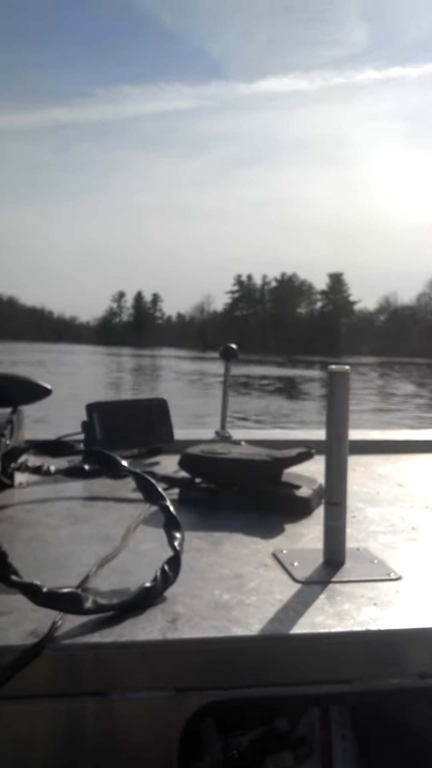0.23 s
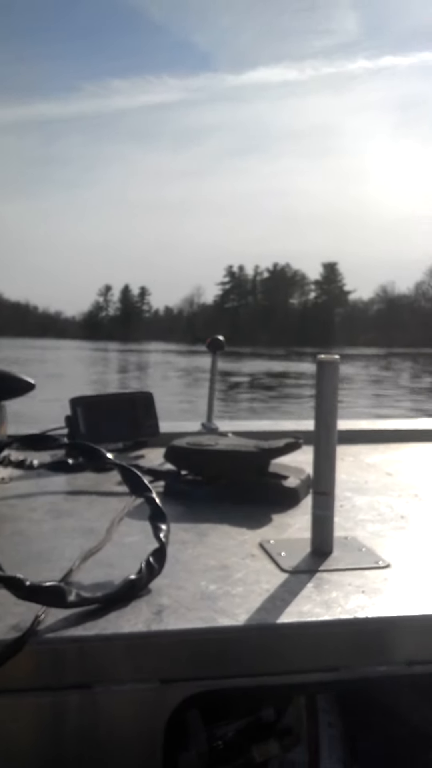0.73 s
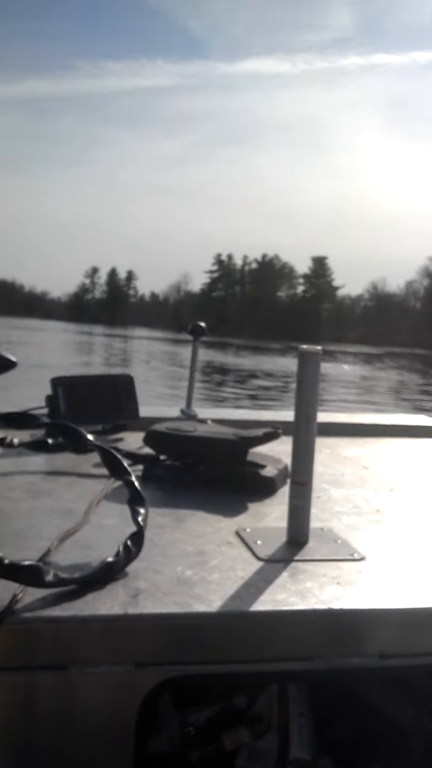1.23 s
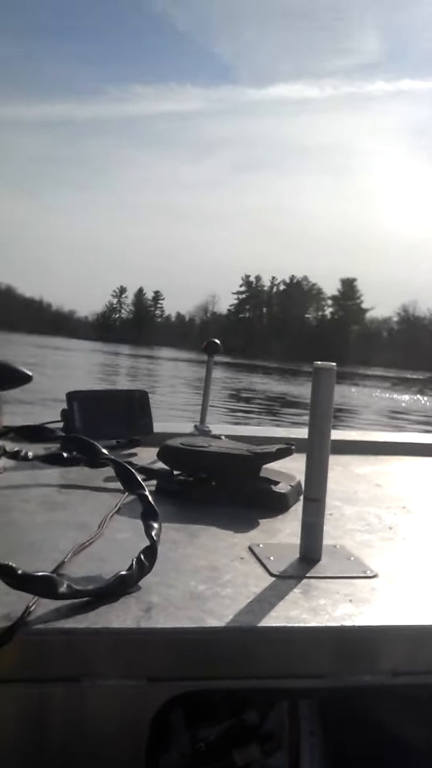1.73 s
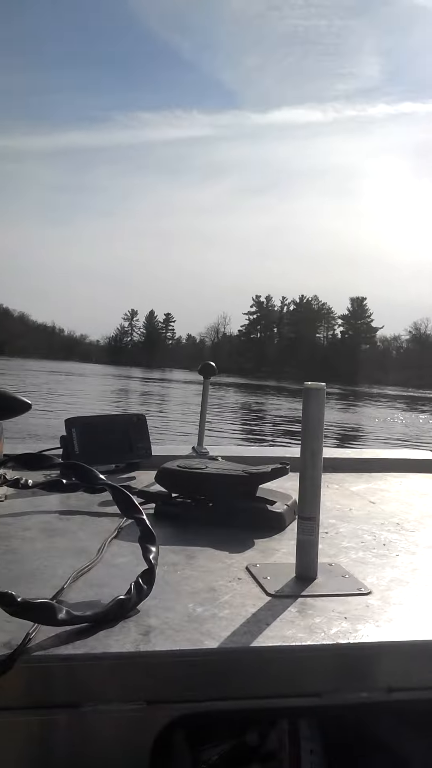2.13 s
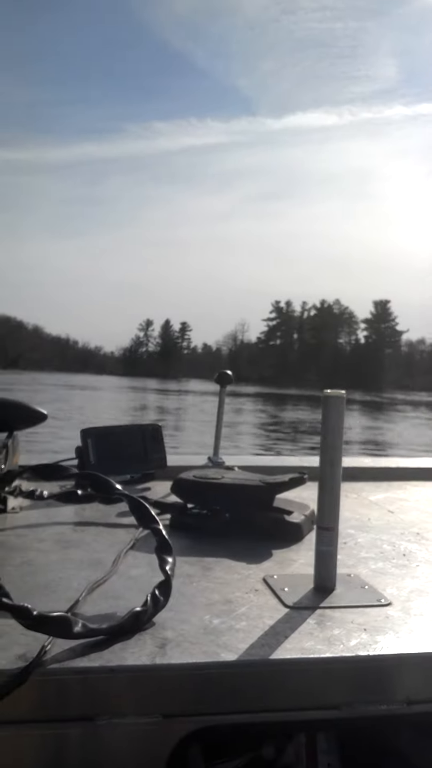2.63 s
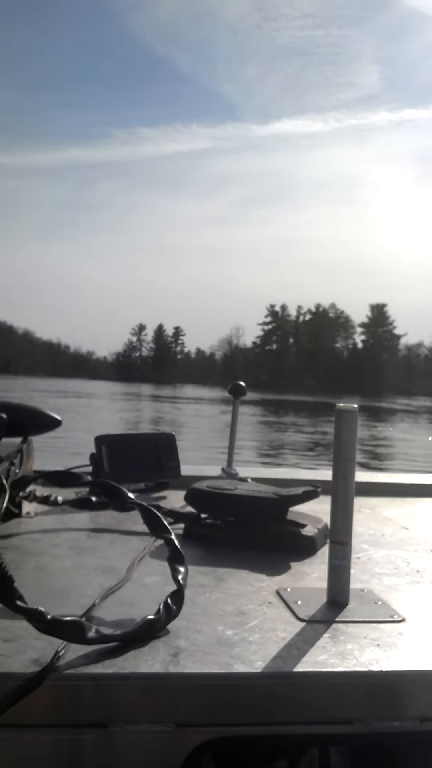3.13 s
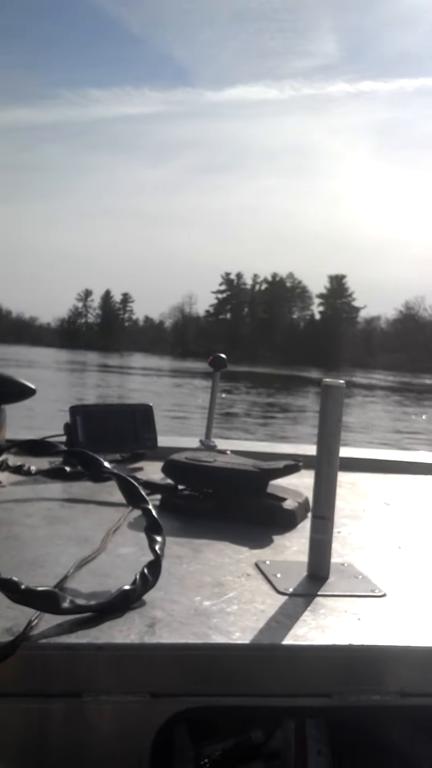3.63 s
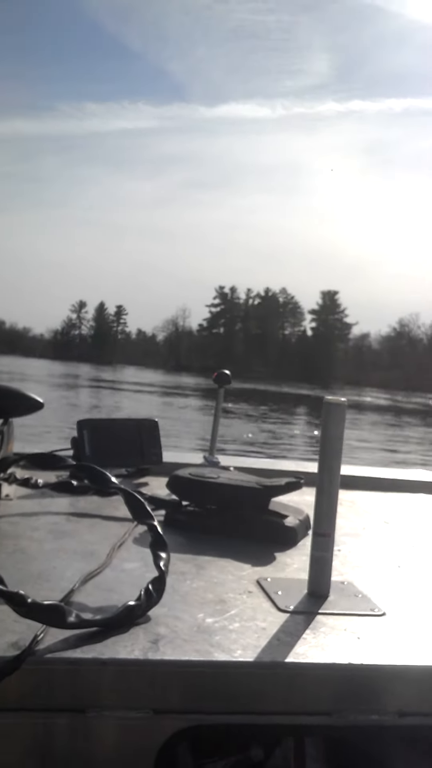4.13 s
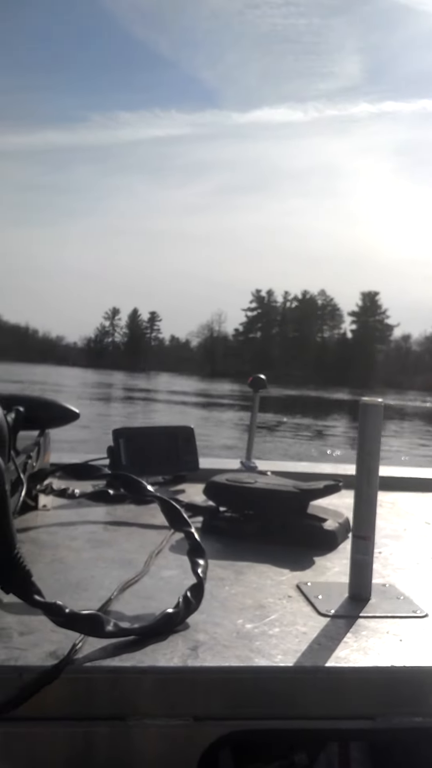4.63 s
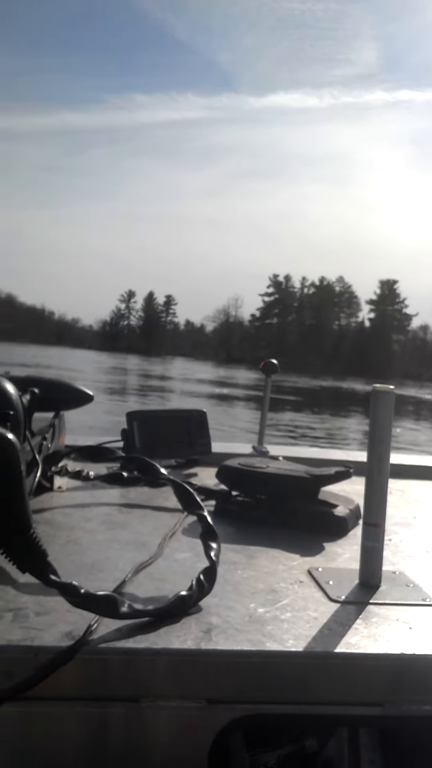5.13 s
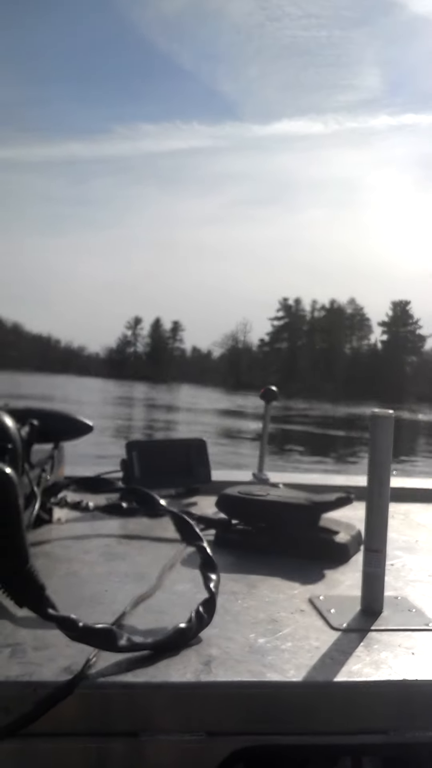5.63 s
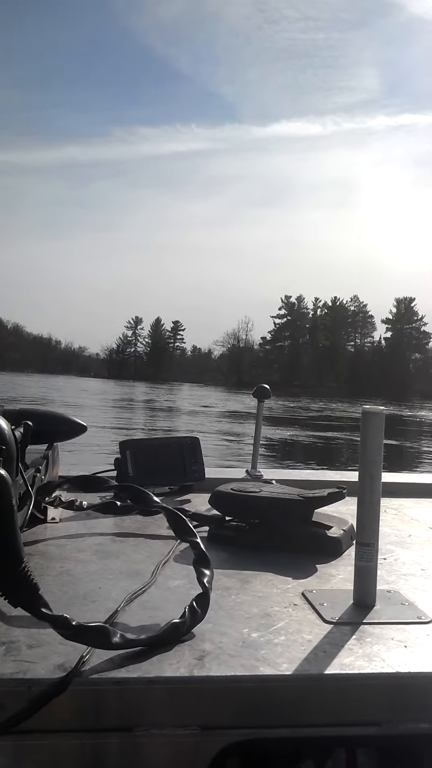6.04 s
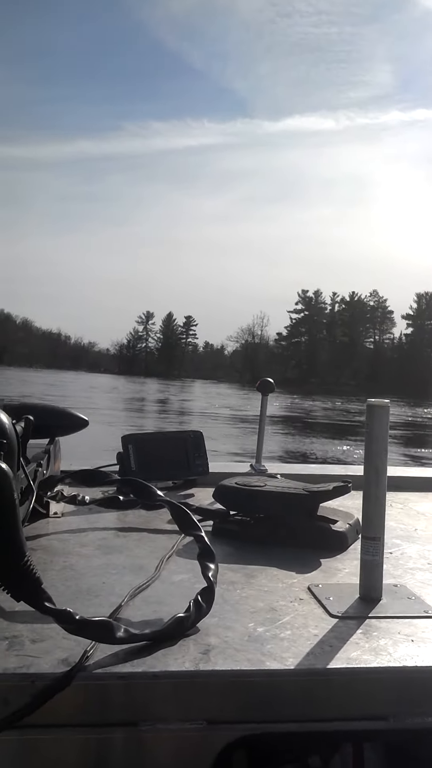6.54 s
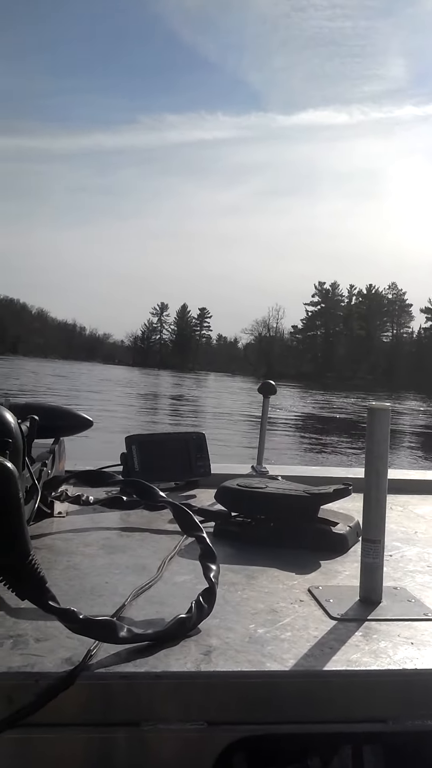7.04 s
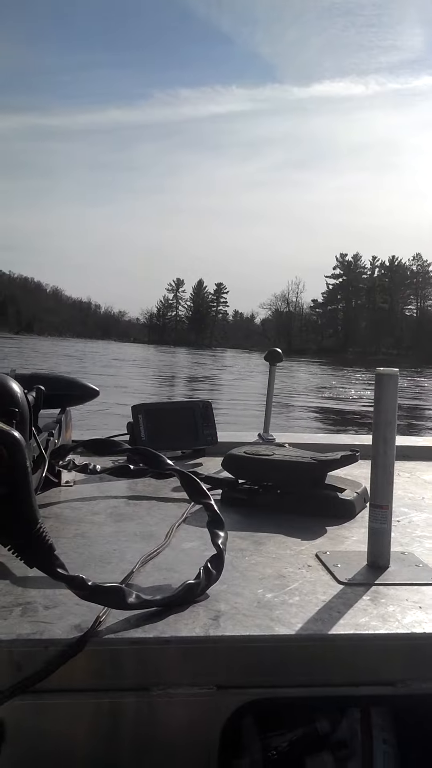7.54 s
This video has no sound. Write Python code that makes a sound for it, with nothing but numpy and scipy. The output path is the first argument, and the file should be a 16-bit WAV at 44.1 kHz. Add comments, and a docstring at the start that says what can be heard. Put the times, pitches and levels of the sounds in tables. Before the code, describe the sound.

On a small open boat speeding along a river, an outboard drones close by, low and buzzing, with a rough exhaust and jet roar that flutters with each turn. Spray hisses on top, strongest in the first second, then thinner and a little duller around 3.5. Wind rumbles and slaps unevenly at both sides of a phone microphone. The level starts held down and swells up within the first second. Wind cracks gather at 1.4 to 1.8, with a sharp one at 2.4. Between 2 and 3.2 the motor rises slightly in pitch and a steady hull boom blooms, joined by a lower hum peaking near 4.4. Slaps hit at 3.6 and 4.8; the hardest come at 5.5 to 6.4, on changing sides. Big hits briefly pull the whole level down before it recovers. The boom fades near the end, with final wind thuds around 7.5 to 7.7, engine still running.

```python
"""A small jet boat planes along a river: its outboard drones in shaft orders lifted by resonant hull panels,
over an exhaust and jet roar puffed once a turn. Headwind rumbles, slaps and snaps at the two ports of a phone
as enveloped noise and pressure pulses, and spray hisses as patchy filtered noise. Left and right are formed by
subtracting each port, slightly delayed, from the other; the level drops at listed times and climbs back."""
import sys
import numpy as np
from scipy import signal
from scipy.fft import rfft, irfft, next_fast_len
from scipy.io import wavfile
from scipy.ndimage import uniform_filter1d, minimum_filter1d, map_coordinates

SR = 44100
rng = np.random.default_rng(int(sys.argv[2]) if len(sys.argv) > 2 else 0)


def to_wav(s):
    """Save 16-bit WAV."""
    ch = np.atleast_2d(s).T  # columns
    pcm = np.round(np.clip(ch, -1, 1) * 32767)  # PCM
    wavfile.write(sys.argv[1], SR, pcm.astype(np.int16))


def ratio(d):
    """dB to gain"""
    e = np.asarray(d, float) / 20
    return 10 ** e


N = 343098
PORT_DELAY = 16  # samples


def unit(x):
    """Normalization to a root-mean-square of 1 along time."""
    return x / np.sqrt(np.mean(x ** 2, axis=-1, keepdims=True) + 1e-20)


def curves(rows):
    """Linear interpolation in time: one value per sample for each column after the time."""
    s, *cols = np.transpose(rows)
    return [np.interp(np.arange(N) / SR, s, c) for c in cols]


def wobble(rate):
    """Band-limited random modulation: a spline through normal knots, rate of them a second."""
    knots = rng.standard_normal(int(N * rate / SR) + 4)
    return map_coordinates(knots, [np.arange(N) * rate / SR])


def filtered(x, response):
    """Linear filtering: the spectrum of x times a complex response of frequency."""
    m = next_fast_len(N + 8192)
    return irfft(rfft(x, m) * response(np.fft.rfftfreq(m, 1 / SR)), m)[..., :N]


def coloured(x, spectrum):
    """Spectral shaping through (f/Hz, level/dB) points on a log axis, silent below them."""
    f, db = np.transpose(spectrum)
    return filtered(x, lambda hz: ratio(np.interp(np.log(hz + 1), np.log(f), db, left=-120)))


def patchy(patchy_db):
    """Non-stationary noise: white noise with patches of random gain in time and frequency."""
    z = signal.stft(rng.standard_normal(N), nperseg=512)[2]
    field = uniform_filter1d(rng.standard_normal(z.shape), size=6, axis=0)
    field = uniform_filter1d(field, size=8, axis=1)
    return signal.istft(z * ratio(patchy_db * field / field.std()), nperseg=512)[1][:N]


def spray():
    """Turbulent broadband radiation: a fine hiss, incoherent between ports, stronger on the upper one."""
    # slow course of the hiss: t/s, swell/dB, brightness above 9 kHz/dB
    air = [(0, 3.5, 1), (.75, 3, 2.5), (1.3, 1.5, 2.5), (2.5, 0, 2.5), (3.5, 0, -3), (5, -1, -0.5),
           (5.5, 0.5, -1), (6.2, -0.5, -1), (7.78, -1, 0)]
    # hiss of spray and air, upper then lower port: f/Hz, relative level/dB
    hiss_spectra = [
        [(700, -2), (1500, 3), (2300, 3), (3300, -3.5), (4800, -5), (6200, -7), (7600, -12.5), (9000, -17.5),
         (10500, -22), (12000, -22), (14000, -18), (15700, -22)],
        [(700, -20), (1500, 1), (2300, -10.5), (3300, -8.5), (4800, -17), (6200, -23.5), (7600, -14),
         (9000, -26.5), (10500, -21), (12000, -21), (14000, -24.5), (15700, -18)],
    ]
    swell_db, air_db = curves(air)
    hiss = np.array([coloured(patchy(patchy_db=1.47), spectrum) for spectrum in hiss_spectra])
    fine = filtered(hiss, lambda hz: 1 / (1 + (9000 / (hz + 1)) ** 8))
    swell_db = swell_db + 0.98 * wobble(3.7) + 0.9 * wobble(16) + 0.7 * wobble(45)
    brightened = hiss + (ratio(air_db) - 1) * fine
    return ratio(-37.5 + swell_db) * brightened / hiss[0].std()


def wind():
    """Turbulent pressure fluctuation: a lumpy rumble and clumps of sharp eddies, each port on its own."""
    # headwind on the ports: t/s, level/dB
    gusts = [(0, -10), (.6, -15), (1.05, -12), (1.7, -13.5), (2, -14), (2.7, -15), (2.95, -14),
             (3.5, -15.5), (3.65, -12), (3.85, -15.5), (4.2, -16), (4.55, -14), (4.68, -21.5), (4.8, -10.5),
             (4.93, -15), (5.03, -12), (5.27, -16), (5.37, -14), (5.48, -13), (5.62, -15.5), (5.75, -13),
             (6.1, -14.5), (6.62, -14.5), (6.75, -17.5), (6.9, -11.5), (7.25, -15.5), (7.7, -14)]
    # buffeting, upper then lower port: f/Hz, relative level/dB
    buffet_spectra = [
        [(25, -11), (48, -15), (80, -7.5), (120, 3.5), (200, -1.5), (300, -4), (500, -17.5), (800, -20.5),
         (1500, -38.5), (3000, -49), (6000, -87)],
        [(25, -20), (48, -30.5), (80, -5.5), (120, -0.5), (200, -2), (300, -7), (500, -10), (800, -24),
         (1500, -39), (3000, -48), (6000, -94)],
    ]
    gust_db = curves(gusts)[0] + 1.32 * wobble(22)  # with a quick flutter
    ports = []
    for spectrum, eddy_db in zip(buffet_spectra, [-27, -24]):
        lumps = wobble(28)
        body = unit(coloured(ratio(1.1 * lumps) * rng.standard_normal(N), spectrum))
        rumble = filtered(ratio(gust_db) * body, lambda hz: 400 ** 2 / (hz ** 2 + 400 ** 2))
        # eddies come thick in the lumps; a few are far stronger than the rest
        chance = 800 / SR * ratio(4 * lumps + 3 * wobble(60))
        struck = rng.random(N) < chance
        strength_db = np.minimum(2.7 * rng.exponential(size=N), 8) + gust_db
        eddies = coloured(struck * rng.standard_normal(N) * ratio(strength_db), spectrum)
        eddies = filtered(eddies, lambda hz: hz ** 2 / (hz ** 2 + 350 ** 2))
        ports.append(rumble + ratio(eddy_db) * unit(eddies))
    return np.array(ports)


def snaps():
    """Impulsive excitation: a pressure impulse and milliseconds of ragged flapping, dulled and band-limited."""
    # sharp snaps of wind: t/s, peak level/dB, top f/Hz, port (0 upper, 1 lower)
    snap_rows = [(1.377, -16.5, 1100, 1), (1.638, -16, 1200, 1), (1.791, -20, 2200, 1),
                 (1.8, -16.5, 1200, 1), (1.814, -17, 1700, 1), (2.412, -10, 2500, 1), (2.418, -12, 1600, 1),
                 (3.642, -21, 2600, 1), (4.768, -18, 1700, 1), (5.539, -8, 2000, 1), (5.702, -23, 2600, 1),
                 (5.706, -17, 1300, 1), (5.729, -14, 1300, 1), (5.746, -17, 1400, 1), (5.961, -10, 2100, 0),
                 (5.964, -22, 3200, 0), (6.125, -14, 1600, 1), (6.141, -10, 2000, 1),
                 (6.656, -18.5, 1000, 0), (7.3, -24, 3300, 0), (7.441, -27, 6000, 0)]
    low_hz, dull_hz = 350, 800
    impulse_db, flap_s = 5, .0045
    t = np.arange(600) / SR
    ports = np.zeros((2, N + SR))
    for (s, db, top_hz, port), noise in zip(snap_rows, rng.standard_normal((len(snap_rows), len(t)))):
        band = np.vstack([signal.butter(N=5, Wn=top_hz, fs=SR, output="sos"),
                          signal.butter(N=1, Wn=dull_hz, fs=SR, output="sos"),
                          signal.butter(N=1, Wn=low_hz, btype="high", fs=SR, output="sos")])
        impulse = ratio(impulse_db) * (t == 0)
        flapping = noise * np.exp(-(t / flap_s) ** 3)
        click = signal.sosfilt(band, impulse + flapping)
        start = round(s * SR)
        ports[round(np.clip(port, 0, 1)), start:start + len(t)] += ratio(db) * click / np.abs(click).max()
    return ports[:, :N]


def slaps():
    """Transient pressure pulse at one port: a single swing with a dull noise crack; light ones at random."""
    # strong slaps of wind: t/s, thud level before its Gaussian/dB, crack peak level/dB, thud f/Hz,
    # port (0 upper, 1 lower)
    strong = [(0.132, 2, -28, 220, 0), (0.757, 1, -35, 198, 0), (1.048, -4, -26, 330, 1),
              (1.175, 2, -30, 169.6, 0), (1.378, -6, -22, 380, 1), (1.64, -1, -21, 380.3, 1),
              (1.793, 1.5, -20.5, 402.3, 1), (1.816, 5, -22, 317, 1), (2.234, 1, -29, 200, 0),
              (2.411, -1, -20, 352.3, 1), (2.622, -2, -26, 291.2, 1), (2.834, 2, -30.5, 400, 1),
              (2.928, 2.5, -30, 340.1, 1), (3.638, -1, -20, 190, 0), (3.642, -1, -19.5, 300, 1),
              (3.894, -2, -28, 289.3, 0), (4.259, 0.5, -23, 324.6, 1), (4.592, 0, -29.5, 199.4, 1),
              (4.769, 4, -22, 260.3, 1), (5.542, -8, -9, 362, 1), (5.7, 1, -24, 340, 1),
              (5.706, 1.5, -24, 356, 1), (5.574, -3, -28, 260, 1), (5.622, -4, -23, 261, 1),
              (5.686, -4, -24, 280, 1), (5.739, -3, -21, 320, 1), (5.964, 0, -9, 415.7, 0),
              (6.143, -2, -16.5, 330, 1), (6.24, 3, -32, 209.8, 0), (6.383, -1, -15, 310.2, 1),
              (6.657, -8, -28, 330, 0), (6.885, 1, -20, 339.6, 1), (7.017, 2, -16.5, 249, 0),
              (7.14, 2, -38, 209.7, 1), (7.525, 1.5, -25, 257.6, 1), (7.671, 0, -21.5, 379, 1),
              (7.68, 1, -18, 378.5, 1)]
    light_slaps, light_thud_db, light_crack_db = 30, -5.5, -32
    light_scatter_db, light_hz = 2, (188, 330)
    crack_rise_s, crack_fall_s, crack_hz = .0015, .004, (350, 1350)
    t = np.arange(-400, 1000) / SR
    ports = np.zeros((2, N + SR))
    edge = signal.butter(3, crack_hz, "bandpass", fs=SR, output="sos")
    when, pitch, side, size = rng.random((light_slaps, 4)).T
    size_db = light_scatter_db * (2 * size - 1)
    light = np.transpose([(when * N - t[0] * SR) / SR, light_thud_db + size_db, light_crack_db + size_db,
                          np.interp(pitch, [0, 1], light_hz), side])
    rows = [*strong, *light]
    shape = np.where(t < 0, np.exp(-(t / crack_rise_s) ** 2), np.exp(-np.abs(t) / crack_fall_s))
    noises = rng.standard_normal((len(rows), len(t)))
    for (s, thud_db, crack_db, thud_hz, port), noise in zip(rows, noises):
        thud = np.exp(-(t * thud_hz / 0.38) ** 2) * np.sin(2 * np.pi * thud_hz * t)
        thud = np.sign(noise[0]) * thud  # push or pull at random
        crack = shape * signal.sosfilt(edge, noise)
        crack = crack / np.abs(crack).max()
        start = round((s + t[0]) * SR)
        ports[round(np.clip(port, 0, 1)), start:start + len(t)] += ratio(thud_db) * thud + ratio(crack_db) * crack
    return ports[:, :N]


def engine():
    """Harmonic synthesis with resonance: wavering shaft orders lifted by hull panels, and a puffed roar."""
    # course of the engine: t/s, shaft f/Hz, swell of the hull boom on order 5/dB,
    # swell of the hum on order 3/dB, swell of the throb on order 2/dB
    course = [(0, 76.4, 4.5, 3.5, 5.5), (.7, 77.08, -1, -1, -6.5), (1.1, 77.48, -1.5, -3, 1),
              (1.4, 77.56, -1, -1, 6), (1.76, 77.74, 0.5, 0, 0), (2, 78.3, 3, 3.5, 3.5),
              (2.45, 78.74, -1, -2, 1.5), (2.6, 79.48, 4.5, 0, -3.5), (2.76, 80.73, 6.5, -4, -6.5),
              (2.81, 80.65, 13.5, 1, -6), (3.05, 81.64, 11, 0.5, 0.5), (3.2, 82.44, 12, 0, 1),
              (4, 82.96, 13, 4.5, 1), (4.27, 83.14, 11, 6.5, 3.5), (4.36, 83.6, 7, 10, 2),
              (4.75, 83.93, 6, 8.5, 0), (5, 83.85, 5, 6.5, 0.5), (5.6, 83.62, 5.5, 2, -2),
              (6, 83.15, 5, 0, 0), (6.7, 83.24, 4, -3, -2), (7, 83.28, 5, 1, -2),
              (7.78, 83.23, -4.5, 1, -3)]
    # shaft orders from the second upward, before panels and swells: level at slow speed/dB, at fast speed/dB
    orders = [(-22, -20), (-29, -29), (-29, -38.5), (-28.5, -30), (-42.5, -47), (-39.5, -52), (-34.5, -44),
              (-43, -46.5), (-39.5, -49), (-45.5, -40.5), (-41.5, -53), (-44.5, -43), (-50.5, -42.5),
              (-55, -47.5), (-43.5, -51), (-52.5, -53.5), (-49, -54), (-49, -62), (-58, -62.5), (-62, -61),
              (-49.5, -54.5), (-58, -66), (-57, -62), (-56, -63)]
    # hull panels that lift any order passing through them: f/Hz, width/Hz, lift/dB
    panels = [(321, 16, 8), (479, 21, 12), (921.4, 13, 6), (1054, 24, 4), (1138, 24, 4), (1734, 23, 6)]
    # exhaust and jet roar: f/Hz, relative level/dB
    roar_spectrum = [(120, -36), (250, -4), (400, 2.5), (600, -10), (900, -11.5), (1300, -13),
                     (2000, -36.5), (3000, -35), (5000, -67)]
    slow_hz, fast_hz = 79.4, 82.2
    firing_scatter_db = 6
    shaft_hz, boom_db, hum_db, throb_db = curves(course)
    turn = 2 * np.pi * np.cumsum(shaft_hz * (1 + 0.00059 * wobble(8))) / SR
    fast = np.clip((shaft_hz - slow_hz) / (fast_hz - slow_hz), 0, 1)
    swells_db = {2: throb_db, 3: hum_db, 5: boom_db}
    waver_db = np.clip(3 - 0.6 * fast - 0.13 * boom_db, 0.3, 5)  # the lines steady as speed and boom rise

    drone = np.zeros(N)
    for k, (slow_db, fast_db) in enumerate(orders, 2):
        lift_db = sum(db / (1 + (2 * (k * shaft_hz - panel_hz) / width) ** 2) for panel_hz, width, db in panels)
        level_db = slow_db + fast * (fast_db - slow_db) + lift_db + swells_db.get(k, 0)
        level_db = level_db + waver_db * wobble(14) + 0.59 * waver_db * wobble(2.54)
        phase = k * turn + (0.14 + 0.01 * k) * wobble(15) + rng.uniform(0, 2 * np.pi)
        drone += np.sqrt(2) * ratio(level_db) * np.sin(phase)

    turns = (turn / (2 * np.pi)).astype(int)
    uneven = ratio(firing_scatter_db * rng.standard_normal(turns[-1] + 1))[turns]  # no two firings alike
    puffs = 1 + uneven * 0.4 * (0.5 - 0.5 * np.cos(turn)) ** 1.5
    roar = unit(coloured(puffs * patchy(patchy_db=1.0), roar_spectrum))
    roar = ratio(-28.0 + 1.4 * wobble(9) + 0.79 * wobble(35)) * roar
    lower = drone + roar  # this port is nearer the stern

    def far_port(hz):
        # heard later and, above the bass, shaded by the body
        return ratio(-3.5 * hz / (hz + 600)) * np.exp(-1j * (0.16 + 2 * np.pi * hz * 0.00015))
    return np.array([filtered(lower, far_port), lower])


def scene():
    """Superposition of the sources' pressures at the upper and lower port."""
    return spray() + wind() + snaps() + slaps() + engine()


def limited(x):
    """Look-ahead gain reduction: the tallest peaks are held under a ceiling."""
    ceiling = .97
    needed = np.minimum(1, ceiling / (np.abs(x).max(axis=0) + 1e-9))
    return x * uniform_filter1d(minimum_filter1d(needed, size=400), size=300)


def weaker_silenced(pair):
    """Mid/side gating: the weaker of sum and difference is silenced near the notches of the port-delay comb."""
    # comb depth under which sum or difference falls silent: f/Hz, share of full level (0-1)
    silent = [(1400, 0.47), (2750, 0.11), (5500, 0.29), (7000, 0), (8300, 0.35), (9600, 0.67),
              (11000, 0.65), (15000, 0.67)]
    top_hz = 15780

    def audible(hz):
        half_lag = np.pi * hz * PORT_DELAY / SR
        comb = np.abs([np.sin(half_lag), np.cos(half_lag)])
        edge = np.interp(hz, *np.transpose(silent), left=0)
        return 1 / (1 + (edge / (comb + 1e-6)) ** 10)
    mid_side = np.array([pair[0] + pair[1], pair[0] - pair[1]]) / 2
    mid, side = filtered(mid_side, lambda hz: audible(hz) * (hz < top_hz))
    return np.array([mid + side, mid - side])


def band_limit(x):
    """A steep low-pass at the top of the band."""
    return signal.sosfilt(signal.butter(12, 17080, fs=SR, output="sos"), x)


def record(dry):
    """Pressure-gradient pickup: delay-and-subtract gives two opposed directions; level drops and limiting follow."""
    # sudden drops of the whole level, which add up: t/s, depth/dB
    drops = [(0, 12), (0.869, 3.5), (1.179, 4.5), (1.818, 6.5), (2.202, 2), (2.421, 3), (2.929, 2.5),
             (3.353, 3), (3.646, 4.5), (4.261, 2.5), (4.775, 8), (5.72, 5), (6.256, 1.5), (6.663, 4.5),
             (7.065, 1), (7.486, 2.5), (7.53, 1)]
    recover_s = 0.72
    late = np.pad(dry, ((0, 0), (PORT_DELAY, 0)))[:, :N]
    pair = dry - late[::-1]
    t = np.arange(N) / SR
    drop_db = sum(depth * (t >= s) * np.exp(-np.abs(t - s) / recover_s) for s, depth in drops)
    pair = limited(pair * ratio(-uniform_filter1d(drop_db, size=350)))
    return band_limit(weaker_silenced(pair))


dry = scene()
out = record(dry)
to_wav(out)
```